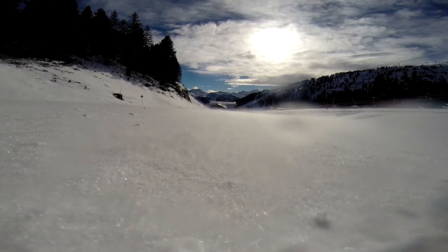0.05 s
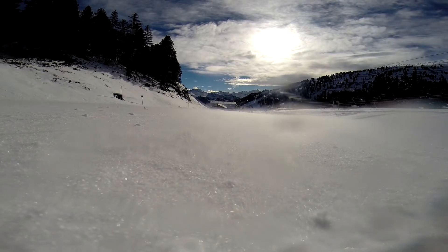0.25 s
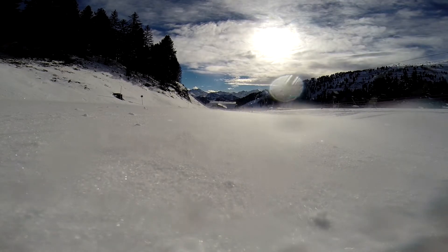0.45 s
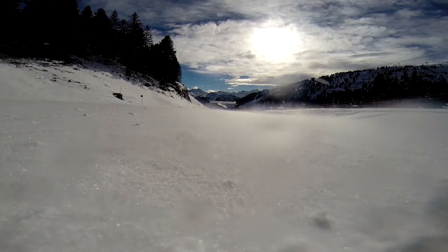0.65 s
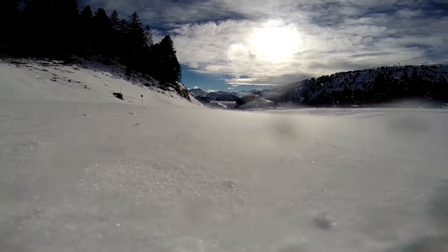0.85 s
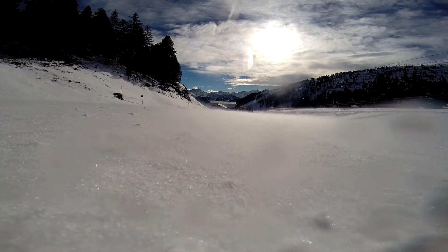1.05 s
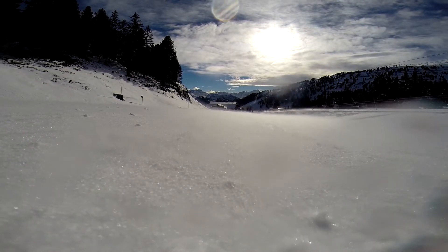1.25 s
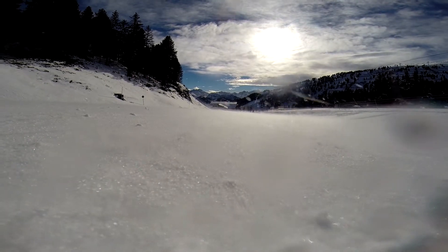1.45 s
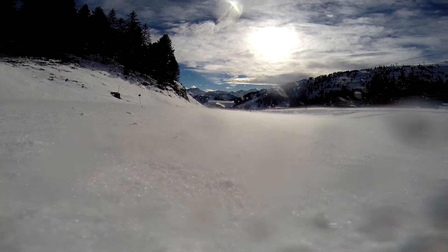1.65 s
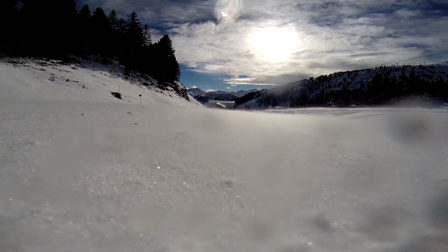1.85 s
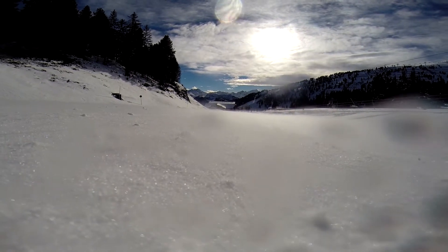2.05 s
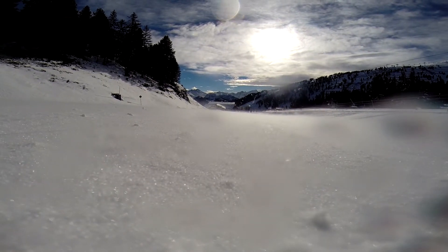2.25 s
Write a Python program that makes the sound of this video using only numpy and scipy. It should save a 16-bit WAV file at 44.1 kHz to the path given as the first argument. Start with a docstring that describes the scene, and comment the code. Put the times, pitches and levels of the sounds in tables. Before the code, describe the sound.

Wind-blown ice grains patter and tick close on a camera housing, sparse at first and busier from about 0.3 seconds, with soft snow crunches. Underneath are a faint hiss, a low wind moan and a very faint electronic whine. From 1.4 to 1.7 seconds a gust buffets the microphone with low thumps and bursting snow clumps. By 2 seconds the patter thins, leaving a few last ticks.

```python
"""A small camera lies on an open snowy slope in the wind. From the start there are a faint hiss, a thin
electronic whine and the low moan of air shedding vortices around the housing. Blown ice grains soon
patter and tick on it, exciting its resonances, while softer snow crunches against it. Near 1.5 s one
strong gust buffets the microphone and clumps of snow burst on the housing. By 2 s the gust has passed
and the patter has thinned, leaving a few last ticks."""
import sys
import numpy as np
from scipy import signal
from scipy.fft import rfft, irfft
from scipy.io import wavfile
from scipy.ndimage import uniform_filter1d

SR = 44100
rng = np.random.default_rng(int(sys.argv[2]) if len(sys.argv) > 2 else 0)


def int16_out(signal):
    """Quantize to a 16-bit WAV file."""
    q = np.round(np.clip(np.atleast_2d(signal).T, -1, 1) * 32767)
    wavfile.write(sys.argv[1], SR, q.astype(np.int16))


N = 101429
TIME = np.arange(N) / SR
FLURRY_HZ = 26.7   # bandwidth of the level fluctuations of blown ice and snow


def from_db(db):
    """Amplitude ratio of a level: tenfold for every 20 dB."""
    return 10 ** (np.asarray(db) / 20)


def unit_rms(x):
    """Normalisation to unit mean power."""
    return x / np.sqrt(np.mean(x ** 2) + 1e-20)


def steady_rms(x, samples):
    """Division by the running rms flattens the envelope."""
    return x / np.sqrt(np.maximum(uniform_filter1d(x * x, samples), 0) + 1e-12)


def curves(rows):
    """Linear interpolation in time of each column after the first."""
    times, *columns = np.transpose(rows)
    return [np.interp(TIME, times, column) for column in columns]


def coloured_noise(spectrum):
    """Spectral shaping of white noise, rolled off beyond the given band, at unit rms."""
    hz, db = np.transpose(spectrum)
    bins = np.maximum(np.arange(N // 2 + 1) * SR / N, 1)
    gain = from_db(np.interp(np.log(bins), np.log(hz), db))
    roll_off = np.minimum(bins / hz[0], 1) * np.minimum(hz[-1] / bins, 1)
    return unit_rms(irfft(rfft(rng.standard_normal(N)) * gain * roll_off, N))


def drift(rate_hz):
    """Low-pass noise: a slow random fluctuation of unit rms."""
    bins = np.arange(N // 2 + 1) * SR / N
    return unit_rms(irfft(rfft(rng.standard_normal(N)) / (1 + (bins / rate_hz) ** 4), N))


def narrowband_noise(hz, width_hz):
    """Random modulation in quadrature broadens a tone into a band."""
    phase = 2 * np.pi * np.cumsum(hz * np.ones(N)) / SR
    return drift(width_hz) * np.cos(phase) + drift(width_hz) * np.sin(phase)


def resonate(x, hz, width_hz):
    """Two damped resonators in cascade give a steep-sided peak of unit gain."""
    radius = np.exp(-np.pi * width_hz / SR)
    gain = (1 - radius ** 2) / 2
    section = [gain, 0, -gain, 1, -2 * radius * np.cos(2 * np.pi * hz / SR), radius ** 2]
    return signal.sosfilt([section] * 2, x + 1e-18)


# spectrum of the distant wind: f/Hz, relative level/dB
HISS_SPECTRUM = [(40, -64), (150, 3), (280, -1.5), (600, -6.5), (1100, -10.5), (1700, -5.5), (3500, -16),
                 (5500, -15), (8000, -20), (15000, -31)]
# spectral lines of the electronics: f/Hz, width/Hz, level/dB
WHINE_LINES = [(5930, 24, -73.5), (8850, 45, -77), (14500, 22, -80)]


def hiss_and_whine(hiss_db=-59.5):
    """Distant wind gives a continuous spectrum, the electronics a line spectrum."""
    hiss = from_db(hiss_db) * coloured_noise(HISS_SPECTRUM)
    whine = sum(from_db(db) * steady_rms(narrowband_noise(hz, width), samples=200)
                for hz, width, db in WHINE_LINES)
    return hiss + whine


# note of the air around the housing: t/s, f/Hz, level/dB
AEOLIAN_TONE = [(0, 170.3, -61), (.29, 177.2, -57), (.5, 185.7, -59.5), (.8, 198, -55.5),
                (1.03, 200.9, -58), (1.75, 174.7, -74.5), (2.3, 191.3, -59)]


def moan():
    """Vortex shedding from the housing gives a low, wavering aeolian tone."""
    hz, db = curves(AEOLIAN_TONE)
    return from_db(db) * steady_rms(narrowband_noise(hz, width_hz=36.6), samples=5000)


# wind pressure on the microphone: t/s, level/dB
WIND_PRESSURE = [(0, -56.5), (.3, -51.5), (.75, -52.5), (1.28, -55.5), (1.38, -43), (1.44, -48.5),
                 (1.545, -36), (1.565, -47), (1.64, -42.5), (1.76, -55.5), (1.95, -52), (2.3, -56)]
# spectra of the rumble and of the turbulence around an eddy: f/Hz, relative level/dB
RUMBLE_SPECTRUM = [(12, 5), (22, 1), (65, -6.5), (90, -11.5), (150, -18.5), (500, -31.5), (1200, -50)]
WAKE_SPECTRUM = [(30, 4), (100, 7.5), (300, -5), (500, -21)]
# eddies that hit the microphone: centre t/s, peak level/dB, half length/s
EDDY_PULSES = [(1.406, -34.5, 0.0075), (1.493, -25.5, 0.0049), (1.537, -28, 0.002), (1.596, -36.5, 0.0023),
               (1.611, -31.5, 0.0053)]


def buffeting(rumble_gain_db=1, wake_db=-16, wake_s=0.0081):
    """Turbulent pressure rumbles on the microphone; each eddy is a pressure dip, duller if longer."""
    wind_db, = curves(WIND_PRESSURE)
    out = from_db(rumble_gain_db + wind_db) * steady_rms(coloured_noise(RUMBLE_SPECTRUM), samples=6000)
    turbulence = from_db(wake_db) * steady_rms(coloured_noise(WAKE_SPECTRUM), samples=600)
    for t, db, half_length in EDDY_PULSES:
        offset = (TIME - t) / half_length
        dip = (offset ** 2 - 1) * np.exp(-.5 * offset ** 2)
        wake = turbulence * np.exp(-.5 * ((TIME - t) / wake_s) ** 2)
        out += from_db(db) * (dip + wake)
    return out


def impacts(flow_db, per_s, spread_db, reference_db=-51):
    """A Poisson process of many small and few large blows; the rate is per_s at the reference flow."""
    rate = per_s * from_db(0.9 * (flow_db - reference_db))
    hits = rng.random(N) < rate / SR
    return hits * from_db(spread_db * np.minimum(rng.exponential(1, N), 4.5))


def housing(clicks, modes, scatter_db=1):
    """Modal superposition: every impact drives each mode with a strength and sign of its own."""
    out = np.zeros(N)
    for hz, width, db in modes:
        force = clicks * from_db(scatter_db * rng.standard_normal(N)) * rng.choice([-1, 1], N)
        out += from_db(db) * resonate(force, hz, width)
    return out


# flow of soft snow against the housing: t/s, level/dB
SNOW_FLUX = [(0.0, -66.5), (0.1, -69), (0.23, -55), (0.27, -62.5), (0.54, -53.5), (0.8, -57), (0.96, -53.5),
             (1.2, -69), (1.27, -50), (1.31, -56), (1.48, -44), (1.7, -45), (1.87, -59), (2.04, -56.5),
             (2.08, -69), (2.28, -54.5)]
# housing modes under soft snow: f/Hz, width/Hz, relative level/dB
SNOW_MODES = [(375, 324, -6), (926, 410, -9.5), (1610, 400, 1), (2110, 960, 1), (3254, 550, -5)]


def snow_crunch(gain_db=-1, flurry_db=2):
    """Soft impacts excite the lower modes of the housing, so snow makes a dull crunch."""
    flow_db, = curves(SNOW_FLUX)
    ring = housing(impacts(flow_db, per_s=900, spread_db=1.5), SNOW_MODES)
    return from_db(gain_db + flow_db + flurry_db * drift(FLURRY_HZ)) * steady_rms(ring, samples=2000)


# clumps of snow bursting on the housing: t/s, level/dB, decay time/s, centre f/Hz
SNOW_CLUMPS = [(0.1354, -32.5, 0.00079, 1650), (0.166, -40, 0.0012, 1780), (0.2098, -40, 0.002, 2000),
               (0.315, -43, 0.0018, 1650), (0.4238, -38.5, 0.007, 1970), (0.5963, -40, 0.0019, 1810),
               (0.638, -39, 0.0049, 1870), (0.7135, -39, 0.021, 2120), (0.961, -33, 0.0013, 2050),
               (0.999, -36.5, 0.001, 1900), (1.14, -41, 0.0047, 1382), (1.393, -30.5, 0.013, 1130),
               (1.4806, -29.5, 0.035, 1470), (1.5113, -21.5, 0.00042, 1260), (1.593, -34.5, 0.015, 1210),
               (1.605, -32, 0.009, 2050), (1.696, -33, 0.0075, 1590), (1.898, -30, 0.0015, 1890)]
# housing modes under a clump: f/Hz, width/Hz, relative level/dB
CLUMP_MODES = [(422, 460, 0), (1010, 410, -10.5), (1536, 540, -9), (1967, 710, -8.5), (3220, 3800, -8)]


def snow_clumps(blow_db=13.5, spread_octaves=0.65):
    """Impact excitation: one blow and a decaying shower of crumbs drive modes near the clump's pitch."""
    out = np.zeros(N)
    starts = [int(row[0] * SR) for row in SNOW_CLUMPS]
    for k, (hz, width, mode_db) in enumerate(CLUMP_MODES):
        envelope = np.zeros(N)
        for start, (t, db, decay_s, centre_hz) in zip(starts, SNOW_CLUMPS):
            coupling = 1 / (1 + (np.log2(hz / centre_hz) / spread_octaves) ** 2)
            envelope[start:] += from_db(db) * coupling * np.exp(-np.abs(TIME[start:] - t) / decay_s)
        shower = rng.choice([-1., 1.], N)
        shower[starts] = (-1) ** k * from_db(blow_db)   # the first blow stands above the crumbs
        shower_rms = np.std(resonate(shower, hz, width))
        out += from_db(mode_db) * resonate(envelope * shower, hz, width) / shower_rms
    return out


# flow of ice grains against the housing: t/s, level/dB
ICE_FLUX = [(0.0, -63.5), (0.09, -71), (0.36, -47), (0.4, -52.5), (0.42, -47), (0.45, -49), (0.51, -42.5),
            (0.55, -48), (0.67, -54.5), (0.74, -47), (0.76, -52), (0.86, -54), (0.89, -45.5), (0.99, -57),
            (1.13, -51.5), (1.15, -58), (1.25, -56), (1.27, -50.5), (1.35, -54), (1.45, -41), (1.53, -48.5),
            (1.55, -41.5), (1.74, -43), (1.91, -62.5), (2.02, -63.5), (2.17, -74.5), (2.3, -57)]
# main and bright housing modes under ice, fine or large: f/Hz, width/Hz, relative level/dB
MAIN_MODES = [(3350, 2130, -5), (4696, 1400, 1), (5520, 1230, -1)]
BRIGHT_MODES = [(7240, 2550, -5), (9030, 1630, 0), (10800, 3100, -5.5), (13360, 7100, -10)]


def ice_patter(gain_db=-0.5, bright_db=-5, flurry_db=-0.1):
    """Brief, hard contacts excite the high modes of the housing, so fine ice makes a bright patter."""
    flow_db, = curves(ICE_FLUX)
    clicks = impacts(flow_db, per_s=1600, spread_db=4)
    main = steady_rms(housing(clicks, MAIN_MODES), samples=3000)
    bright = steady_rms(housing(clicks ** 0.72, BRIGHT_MODES), samples=3000)   # larger grains are duller
    envelope = from_db(gain_db + flow_db + flurry_db * drift(FLURRY_HZ))
    return envelope * (main + from_db(bright_db) * bright)


def tick(force, modes, detune=1, width_ratio=0.58):
    """Transient response of the housing: narrowed modes summed in alternating sign, at unit peak."""
    ring = sum((-1) ** k * from_db(db) * resonate(force, hz * detune, width * width_ratio)
               for k, (hz, width, db) in enumerate(modes))
    return ring / np.abs(ring).max()


# single large ice grains: t/s, main peak level/dB, bright peak level before shatter_db/dB
GRAIN_STRIKES = [(0.1364, -37, -44.5), (0.2373, -33.5, -31.5), (0.2466, -29, -40), (0.2741, -38, -48),
                 (0.3137, -31.5, -37), (0.3432, -33, -30.5), (0.4207, -30.5, -38), (0.5142, -22, -45),
                 (0.5379, -28, -31), (0.5599, -37, -37), (0.5718, -37.5, -35), (0.6654, -38, -37),
                 (0.6762, -29, -41), (0.712, -27, -34), (0.7324, -31, -35), (0.7553, -32, -43),
                 (0.7662, -30, -31), (0.77, -28.5, -27.5), (0.8545, -34, -28.5), (0.863, -25, -30),
                 (0.8832, -27, -37), (0.937, -29.5, -34), (0.9612, -27, -26.5), (0.9681, -21.5, -24.5),
                 (1.005, -28, -34), (1.0293, -35, -37), (1.0563, -19, -35), (1.066, -31, -35),
                 (1.0834, -29, -36), (1.0919, -25, -40), (1.1215, -24, -33), (1.1617, -43, -35),
                 (1.2158, -33.5, -42), (1.279, -30.5, -33), (1.3173, -32.5, -35), (1.391, -28, -31),
                 (1.5663, -25.5, -27.5), (1.6206, -21.5, -26), (1.657, -25, -25), (1.9925, -37.5, -39),
                 (2.215, -34.5, -37.5), (2.2569, -38.5, -37)]


def hard_grains(pitch_scatter=0.052, shatter_s=0.00063, shatter_db=-3):
    """An impulse rings the main modes, pitched by where it lands; shattering drives the bright ones."""
    samples = 256
    click = signal.unit_impulse(samples)
    shatters = rng.standard_normal((len(GRAIN_STRIKES), samples)) * np.exp(-TIME[:samples] / shatter_s)
    detunes = 1 + pitch_scatter * rng.standard_normal(len(GRAIN_STRIKES))
    out = np.zeros(N + samples)
    for (t, main_db, bright_db), shatter, detune in zip(GRAIN_STRIKES, shatters, detunes):
        main = from_db(main_db) * tick(click, MAIN_MODES, detune)
        bright = from_db(bright_db + shatter_db) * tick(shatter, BRIGHT_MODES)
        start = int(t * SR)
        out[start:start + samples] += main + bright
    return out[:N]


def scene():
    """Free-field superposition: the pressures add at one microphone, with no echo on the open snow."""
    ice_and_snow = ice_patter() + hard_grains() + snow_crunch() + snow_clumps()
    return (ice_and_snow + buffeting() + moan() + hiss_and_whine())[None]


def record(dry, cutoff_hz=15700):
    """Band limiting: an elliptic low-pass filter cuts the top steeply."""
    return signal.sosfilt(signal.ellip(10, .2, 80, cutoff_hz, fs=SR, output="sos"), dry)


dry = scene()
out = record(dry)
int16_out(out)
```